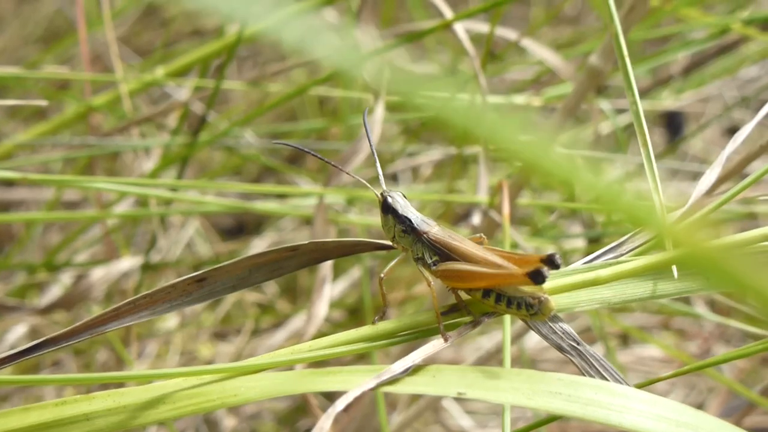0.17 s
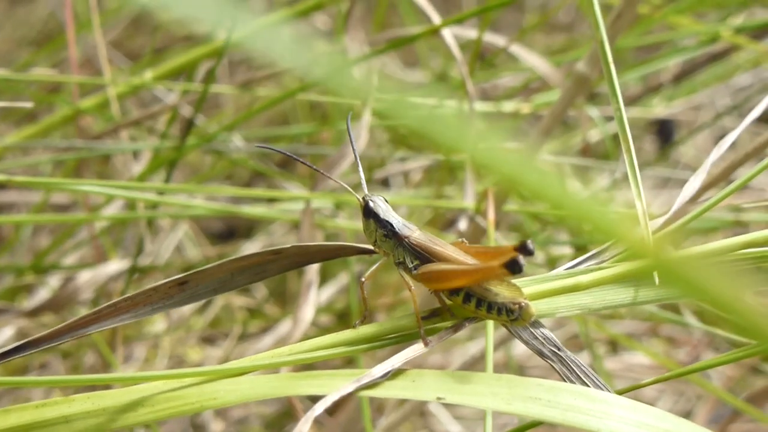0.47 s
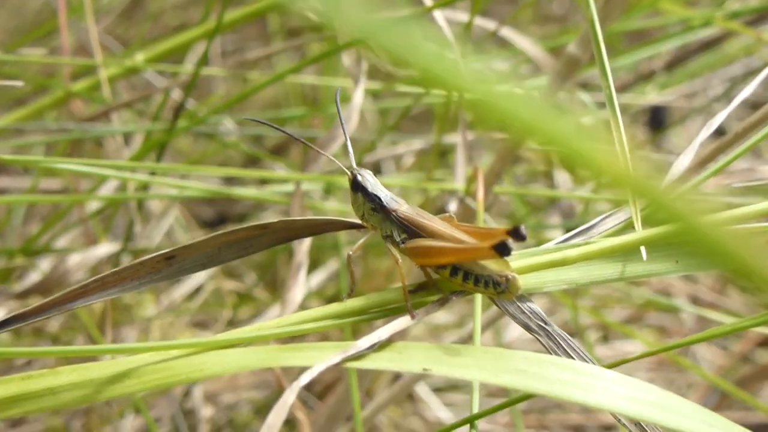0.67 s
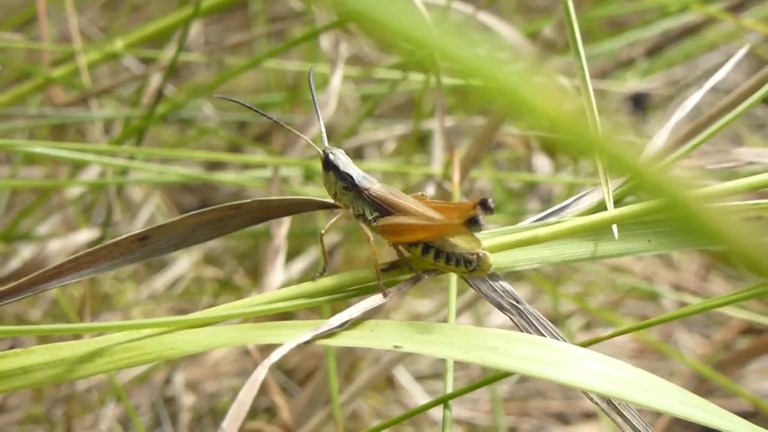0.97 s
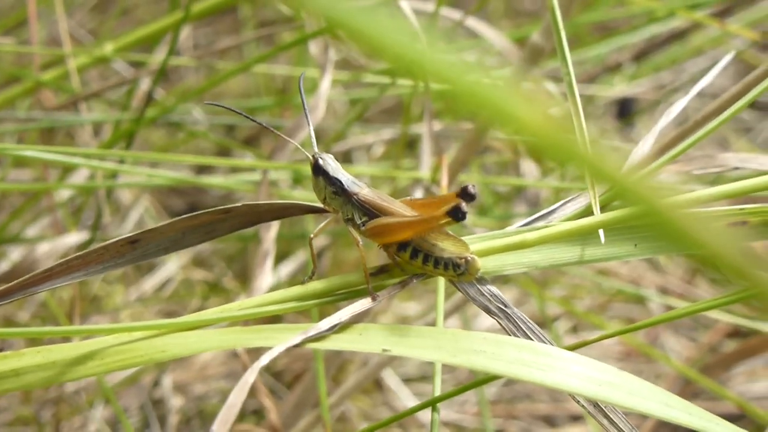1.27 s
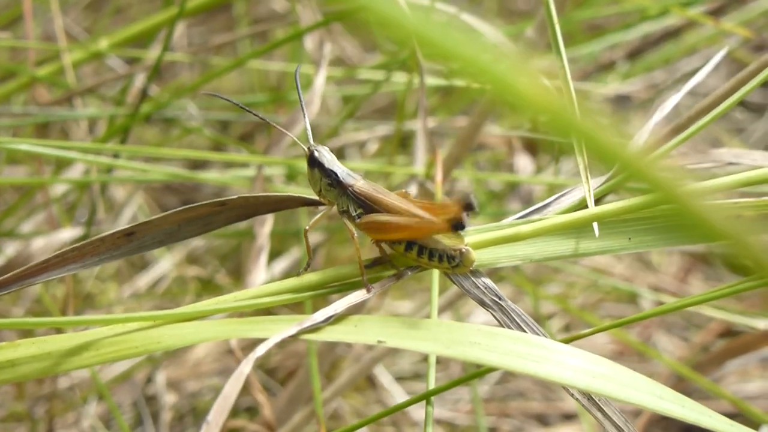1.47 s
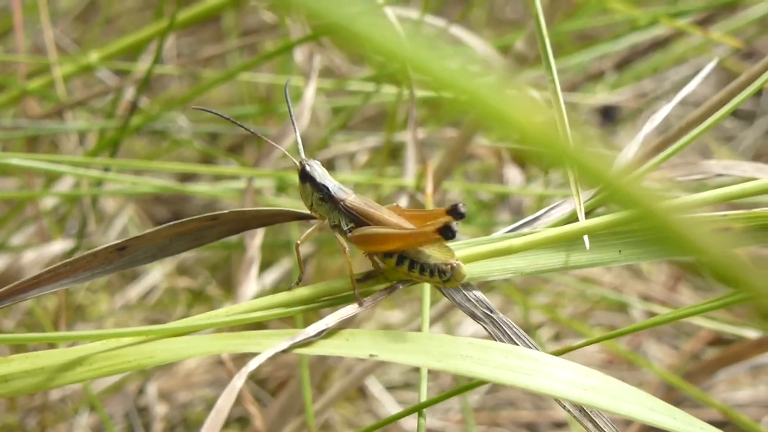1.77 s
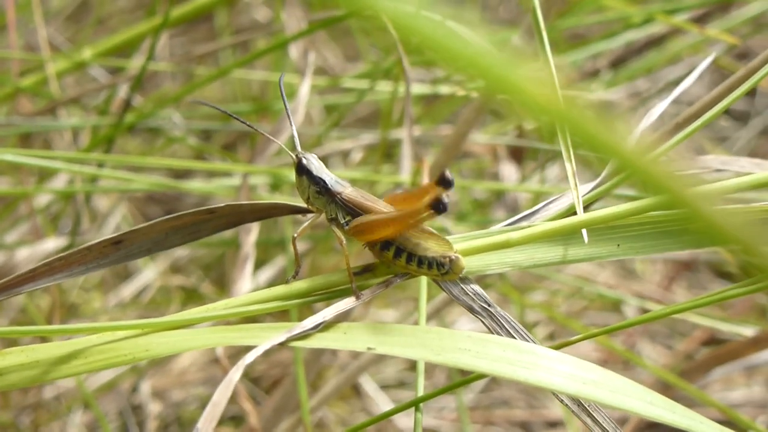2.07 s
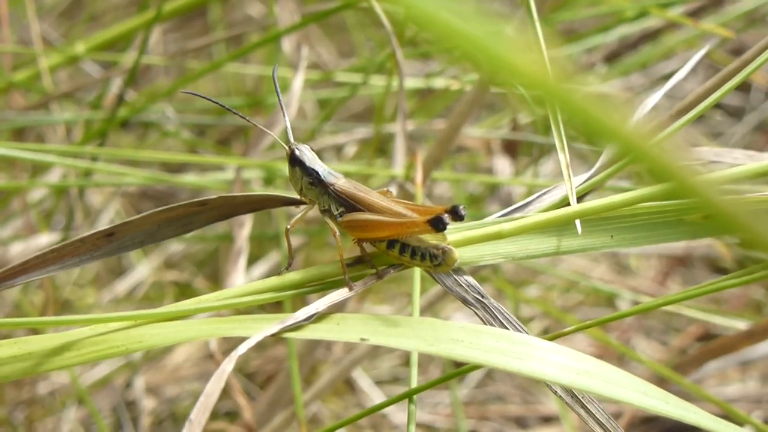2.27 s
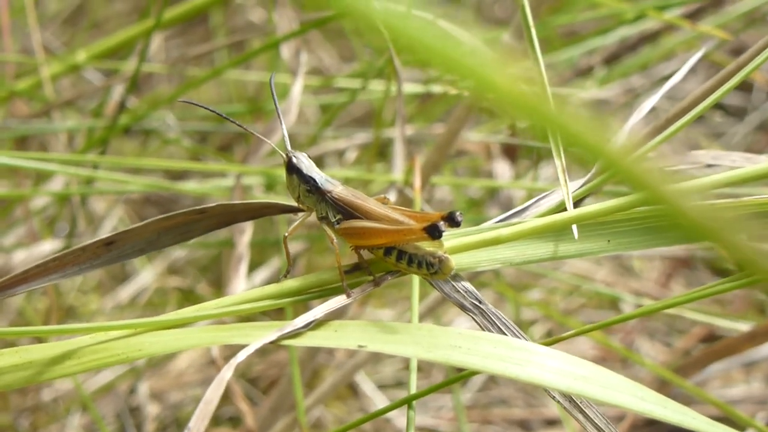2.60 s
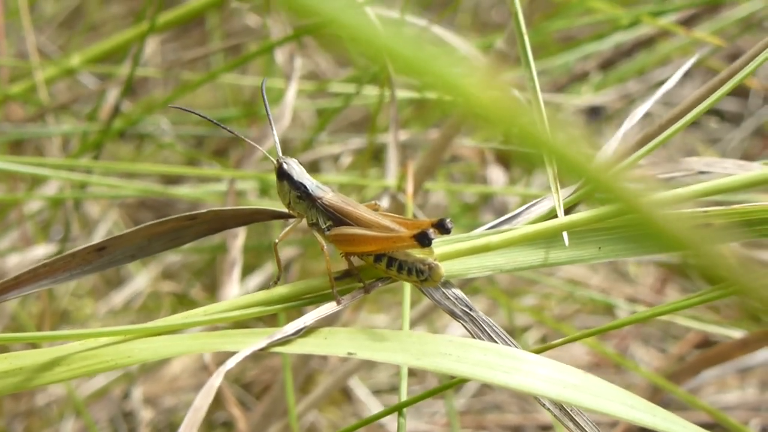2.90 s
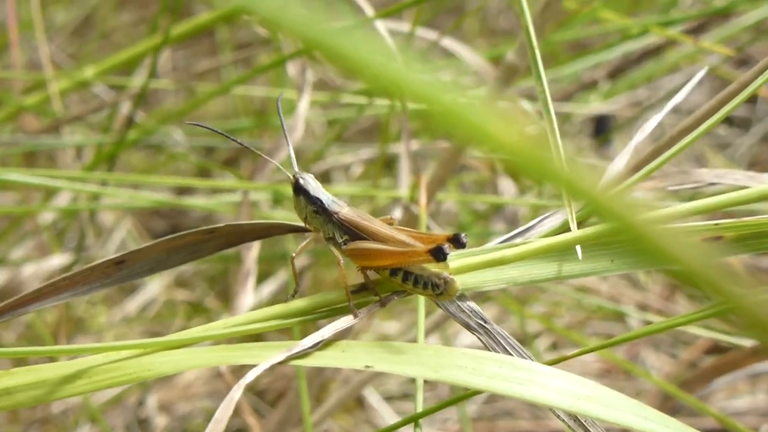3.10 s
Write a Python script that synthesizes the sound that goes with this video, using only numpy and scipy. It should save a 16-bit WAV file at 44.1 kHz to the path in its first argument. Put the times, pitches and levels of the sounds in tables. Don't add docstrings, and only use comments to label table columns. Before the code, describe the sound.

A grasshopper sings close to a small camera's stereo microphone, in a dry outdoor meadow without echo. After a tiny silence, from 0.05 to 2.17 seconds come thirteen raspy syllables, roughly six per second: a soft fizzing swell, then three to five louder, crisp jerks of fast treble clicks, slightly stronger later. Then only soft traffic rumble, hiss, faint high whine and a slight grass rustle near 2.9.

```python
import sys
import numpy as np
from scipy import signal
from scipy.fft import rfft, irfft
from scipy.io import wavfile
from scipy.ndimage import uniform_filter1d

SR = 44100
rng = np.random.default_rng(int(sys.argv[2]) if len(sys.argv) > 2 else 0)


def dump_mix(stems):
    frames = np.atleast_2d(stems).T
    limited = np.clip(frames, -1, 1)
    pcm = np.round(limited * 32767).astype(np.int16)
    wavfile.write(sys.argv[1], SR, pcm)


def attenuation_scalar(level_db):
    decades = np.asarray(level_db, float) / 20
    return 10 ** decades


N = 143325


def evened(x):
    return x / np.sqrt(np.mean(x ** 2) + 1e-20)


def read(points, hz):
    f, value = np.transpose(points)
    return np.interp(np.log(hz + 1), np.log(f + 1), value)


def drift(seconds):
    size = max(round(seconds * SR), 1)
    return evened(uniform_filter1d(uniform_filter1d(rng.standard_normal(N), size), size))


# [f/Hz, density/dB per Hz]
CENTRE_SPECTRUM = [(25, -17.5), (183, -1), (480, -7), (720, -10.5), (950, -13), (2000, -17), (4700, -19),
                   (10500, -24.5), (15500, -23.5)]
# [f/Hz, density/dB per Hz]
WIDTH_SPECTRUM = [(15, -52), (25, -38), (126, -9.5), (164, -8.5), (246, -7.5), (482, -5.5), (1530, -10.5),
                  (10600, -26), (15500, -26)]
# [f/Hz, width/Hz, level/dB]
TRAFFIC_HUMS = [(88, 10, 6), (630, 110, 4.5)]
# [centre t/s, half length t/s, f/Hz, width/Hz, level/dB]
RUSTLES = [
    (2.9, .17, 2900, 550, 3.0),
    (.06, .03, 100, 60, 4),
    (.58, .05, 80, 60, 6),
    (1.25, .03, 60, 40, 6),
    (1.97, .04, 100, 50, 6),
    (2.03, .04, 300, 100, 4),
    (.02, .05, 600, 150, -4),
    (3.13, .04, 120, 50, -6),
]


def meadow():
    centre_db, width_db = -50, -48.5
    patchy_db, swell_db, flicker_db = 0.27, -1.05, 1.0
    frames, hz = N // 256 + 5, np.fft.rfftfreq(1024, 1 / SR)
    a, b, c, d, patches = rng.standard_normal((frames, 513, 5)).T
    patches = evened(uniform_filter1d(uniform_filter1d(patches, 8, 0), 10, 1))
    at = np.minimum(np.arange(frames) * 256, N - 1)
    moving = patchy_db * patches + swell_db * drift(0.07)[at] + flicker_db * drift(0.023)[at]
    moving = moving / (1 + (hz[:, None] / 3500) ** 2)
    for s, half, rustle_hz, width_hz, rustle_db in RUSTLES:
        in_time = ((at / SR - s) / half) ** 2
        in_pitch = ((hz[:, None] - rustle_hz) / width_hz) ** 2
        moving += rustle_db * np.exp(-in_time - in_pitch)
    hum = sum(db / (1 + ((hz - f) / width) ** 2) for f, width, db in TRAFFIC_HUMS)
    shapes = np.array([read(CENTRE_SPECTRUM, hz) + hum, read(WIDTH_SPECTRUM, hz)])[:, :, None]
    z = np.array([a + 1j * b, c + 1j * d]) * attenuation_scalar(shapes + moving)
    mid, side = signal.istft(z, nperseg=1024, noverlap=768)[1][:, :N]
    mid, side = attenuation_scalar(centre_db) * evened(mid), attenuation_scalar(width_db) * evened(side)
    return np.array([mid + side, mid - side])


# [f/Hz, level/dB rms]
WHINE_TONES = [(6540, -81), (7820, -77), (8500, -73.5), (9625, -78.5), (10450, -77.5), (11450, -81)]


def whine():
    bursts_per_s, burst_at, burst_share = 30.0, .8, .2
    waver_db, waver_rad = 2.0, 1.0
    t = np.arange(N) / SR
    phase = (t * bursts_per_s - burst_at + .5) % 1 - .5
    burst = np.exp(-phase ** 2 / burst_share ** 2)
    tones = np.zeros(N)
    for hz, db in WHINE_TONES:
        level = attenuation_scalar(db + waver_db * drift(.04))
        tones += level * np.sin(2 * np.pi * hz * t + waver_rad * drift(0.052))
    return np.sqrt(2) * evened(burst) * tones


# [start t/s, end t/s, first level/dB, last level/dB]
UPSTROKES = [(0.074, 0.163, -64, -43), (0.24, 0.322, -61.5, -40), (0.396, 0.493, -60, -42.5),
             (0.562, 0.654, -60, -40), (0.728, 0.821, -58.5, -40), (0.886, 0.986, -59, -38.5),
             (1.065, 1.148, -55, -38.5), (1.205, 1.288, -59, -39), (1.37, 1.463, -56, -37.5),
             (1.543, 1.623, -52.5, -38.5), (1.714, 1.789, -50.5, -38), (1.871, 1.945, -55.5, -36.5),
             (2.055, 2.108, -49.5, -38)]


def upstrokes():
    bend, stutter_from = 0.86, 0.74
    lift_db_per_s, stutter_db, uneven_db = 450, 2.5, 2
    t, slow, stutter = np.arange(N) / SR, np.zeros(N), drift(0.0041) - 1
    for start, end, first_db, last_db in UPSTROKES:
        swell = np.clip((t - start) / (end - start), 0, 1) ** bend
        lift_db = lift_db_per_s * (np.maximum(t - end, 0) + 2 * np.maximum(start - t, 0))
        shaky = np.clip((swell - stutter_from) / (1 - stutter_from), 0, 1)
        slow += attenuation_scalar(first_db + (last_db - first_db) * swell - lift_db + stutter_db * stutter * shaky)
    return slow * attenuation_scalar(uneven_db * drift(0.006))


# [centre t/s, level/dB, length t/s]
JERKS = [(0.0578, -38, 0.0038), (0.1628, -38, 0.0026), (0.1739, -34.4, 0.005), (0.189, -32, 0.0069),
         (0.2086, -32.5, 0.0051), (0.32, -36.5, 0.0035), (0.3319, -34.5, 0.0044), (0.3468, -30.5, 0.0048),
         (0.3644, -30.5, 0.0044), (0.3851, -35, 0.0033), (0.482, -37, 0.0039), (0.5223, -30.5, 0.003),
         (0.5403, -30, 0.0037), (0.6464, -39, 0.0074), (0.6572, -35.5, 0.0063), (0.6732, -32.5, 0.0057),
         (0.69, -30.0, 0.0039), (0.7106, -35.0, 0.0032), (0.8178, -35.5, 0.0063), (0.8319, -30, 0.0042),
         (0.8493, -28.6, 0.0044), (0.8676, -43.4, 0.0031), (0.9828, -36.5, 0.0061), (0.999, -30.5, 0.0049),
         (1.0154, -28.5, 0.005), (1.0352, -32.6, 0.0021), (1.1462, -33.5, 0.005), (1.161, -30.5, 0.0076),
         (1.1769, -29, 0.0056), (1.1962, -27.5, 0.0047), (1.299, -35, 0.0072), (1.3104, -32, 0.0044),
         (1.3284, -30.5, 0.0056), (1.3482, -28, 0.0048), (1.3659, -43.9, 0.0049), (1.3783, -46, 0.0081),
         (1.4674, -35, 0.009), (1.4827, -31, 0.008), (1.4995, -27, 0.0049), (1.5193, -27.5, 0.005),
         (1.6316, -33.0, 0.0049), (1.6483, -30, 0.005), (1.666, -27, 0.0042), (1.6857, -29, 0.0057),
         (1.7929, -33, 0.0072), (1.8087, -29.5, 0.0076), (1.8262, -28, 0.0053), (1.8457, -30.5, 0.0042),
         (1.9363, -38, 0.0098), (1.9492, -36, 0.009), (1.9625, -33, 0.005), (1.9788, -29, 0.0058),
         (1.9981, -27.5, 0.0042), (2.0202, -41, 0.0046), (2.1095, -35.5, 0.0089), (2.1214, -31, 0.0038),
         (2.141, -29.5, 0.0069), (2.1613, -30.0, 0.0045)]


def jerks():
    rise, fall, edge = 2.5, 2.1, 4.0
    tail_db, tail_s, tail_lag_s = -19.5, .004, .0015
    t, fast = np.arange(N) / SR, np.zeros(N)
    for s, level_db, length in JERKS:
        span = slice(round(s * SR) - 800, round(s * SR) + 800)
        after = t[span] - s
        steep = np.where(after < 0, rise, fall)
        pulse_db = 6 * (steep * abs(after) / length) ** edge
        tail_fall_db = 6 * ((after - tail_lag_s) / tail_s) ** 2
        fast[span] += attenuation_scalar(level_db - np.minimum(pulse_db, 200))
        fast[span] += attenuation_scalar(level_db + tail_db - np.minimum(tail_fall_db, 200))
    return fast


def pegs(slow, fast):
    slow_per_s, fast_per_s = 750, 1500
    share = np.clip((20 * np.log10(fast + 1e-9) + 36) / 5, 0, 1)
    rate = slow_per_s + (fast_per_s - slow_per_s) * share
    turns = np.cumsum(rate * (1 + 0.18 * drift(.01))) / SR + .2 * np.tanh(drift(.001))
    hit = np.diff(np.floor(np.maximum.accumulate(turns)), prepend=0) > 0
    size = attenuation_scalar(0.5 * np.clip(rng.standard_normal(N), -3, 1.5))
    return hit * size * np.maximum(slow, fast) * np.sqrt(SR / rate / 0.99)


# [t/s, peak level/dB]
LONE_PEGS = [(0.1589, -24), (0.1663, -25.4), (0.3255, -25.8), (0.3382, -20), (0.3395, -20), (0.351, -23.0),
             (0.487, -27), (0.4902, -26.0), (0.492, -26), (0.495, -24.4), (0.4997, -25), (0.506, -27),
             (0.5101, -22.3), (0.5142, -23.9), (0.6778, -22), (0.812, -30), (0.9718, -25.5), (0.974, -25.5),
             (0.9758, -26.5), (0.978, -26.3), (0.988, -23), (1.132, -24.6), (1.134, -24.8), (1.1351, -26),
             (1.1365, -22.5), (1.1407, -26), (1.1416, -22.5), (1.1506, -23.6), (1.1994, -30), (1.4605, -22),
             (1.4631, -25), (1.4641, -24), (1.4655, -23.7), (1.4666, -24), (1.4684, -21.6), (1.4695, -22.1),
             (1.4705, -22), (1.4715, -23.5), (1.6074, -26.5), (1.6111, -25.1), (1.6183, -22.6),
             (1.6188, -23), (1.6229, -24), (1.6259, -23.7), (1.6276, -24.5), (1.6895, -23.9), (1.7693, -27),
             (1.7811, -25.5), (1.7817, -25), (1.7825, -25), (1.7846, -25), (1.7853, -24.5), (1.7972, -25),
             (1.9347, -27), (1.9393, -26.3), (1.966, -22.5), (2.1246, -22), (2.1254, -22), (2.1271, -19.5),
             (2.165, -23.1)]


def leg_clicks(slow, fast):
    lone_db, clear_s = 4.5, 0.00051
    rasp = pegs(slow, fast) + attenuation_scalar(-7) * pegs(slow * attenuation_scalar(4.5), fast)
    lone = np.zeros(N)
    for s, peak_db in LONE_PEGS:
        lone[round(s * SR)] = attenuation_scalar(peak_db + lone_db)
    clear = uniform_filter1d(lone, 2 * round(clear_s * SR) + 1) < 1e-9
    return lone + rasp * clear


def colour(points, hz):
    gain = attenuation_scalar(read(points, hz))
    return gain / np.sqrt(2 / SR * np.sum(gain[(hz > 5000) & (hz < 15000)] ** 2) * hz[1])


# [f/Hz, density/dB per Hz]
UPSTROKE_WING = [(2500, -20.5), (4100, -7), (4900, -6), (6500, -3.5), (9000, -3.5), (11000, -3),
                 (13100, -1), (15500, -5.5)]
# [f/Hz, density/dB per Hz]
JERK_WING = [(2500, -28.5), (4000, -19), (4900, -8.5), (6200, -4), (9000, -1.5), (11000, 0), (13600, 1),
             (15500, -6)]
# [delay t/ms, gain]
FAR_PATHS = [(-0.05, 0.2), (0.01, 0.42), (0.116, 0.13), (0.343, 0.079), (0.433, 0.039), (0.506, -0.13),
             (0.625, 0.13)]
# [f/Hz, level/dB]
FAR_SHADE = [(4800, -0.5), (7600, -2.5), (9000, 2.5), (10300, -2), (11700, -2), (13100, -14.5), (14500, 3),
             (15500, -5)]


def grasshopper(spots=18):
    ring_db, scatter_db = -4.5, -7.5
    t60_s = np.array([[.0035], [0.0037]])
    slow, fast = upstrokes(), jerks()
    clicks = leg_clicks(slow, fast)
    spot, t, out = rng.integers(0, spots, N), np.arange(320) / SR, np.zeros((2, N))
    for k in range(spots):
        ring, scatter = rng.standard_normal((2, 320)) * attenuation_scalar(-60 * t / t60_s)
        ring = attenuation_scalar(ring_db) * ring / np.linalg.norm(ring) + (t == 0)
        taps = [ring / np.linalg.norm(ring), attenuation_scalar(scatter_db) * scatter / np.linalg.norm(scatter)]
        out += signal.oaconvolve((clicks * (spot == k))[None], taps, axes=1)[:, :N]
    hz = np.fft.rfftfreq(N, 1 / SR)
    jerk_share = fast / (fast + slow + 1e-9)
    rising = rfft(out * (1 - jerk_share)) * colour(UPSTROKE_WING, hz)
    falling = rfft(out * jerk_share) * colour(JERK_WING, hz)
    near, scattered = rising + falling
    paths = sum(gain * np.exp(-2j * np.pi * hz * ms / 1000) for ms, gain in FAR_PATHS)
    far = (near * paths + scattered) * attenuation_scalar(read(FAR_SHADE, hz))
    return irfft(np.array([near, far]), N)


def scene():
    return meadow() + whine() + grasshopper()


# [f/Hz for centre, f/Hz for width]
THIN_FROM = [1700, 2400]
# [f/Hz for centre, f/Hz for width]
THIN_TO = [3500, 4800]


def thinned(x, size=6):
    busy_db, lost_share = -47, .16
    mid_side = np.array([x[0] + x[1], x[0] - x[1]]) / 2
    f, _, z = signal.stft(mid_side, SR, nperseg=1024, noverlap=768)
    busy = 10 * np.log10(2 * np.sum(abs(z[0, f > 5000]) ** 2, 0) + 1e-12) > busy_db
    luck = rng.random((2, len(f) // size + 1, z.shape[2] // size + 1))
    luck = luck.repeat(size, 1).repeat(size, 2)[:, :len(f), :z.shape[2]]
    band = (f > np.c_[THIN_FROM]) & (f < np.c_[THIN_TO])
    drop = (luck < lost_share) & busy & band[:, :, None]
    mid, side = signal.istft(z * ~drop, SR, nperseg=1024, noverlap=768)[1][:, :N]
    return np.array([mid + side, mid - side])


# [centre t/s, length t/s, from f/Hz, share of bands lost]
DROPOUTS = [
    (.3755, .010, 3200, .6),
    (.531, .010, 3800, .6),
    (.701, .010, 3500, .6),
    (1.187, .009, 5000, .55),
    (1.508, .007, 3300, .9),
    (1.676, .007, 5500, 1),
    (1.818, .004, 4000, .6),
    (2.005, .005, 3800, .6),
]


def hiss_gaps(x):
    f, at, z = signal.stft(x, SR, nperseg=128, noverlap=96)
    keep, luck = np.ones(z.shape[1:]), rng.random((len(DROPOUTS), 17)).repeat(4, 1)
    for (s, length, from_hz, share), row in zip(DROPOUTS, luck):
        lost = (f > from_hz) & (row[:len(f)] * np.clip(f / 9000, .3, 1) < share)
        keep *= 1 - np.outer(lost, abs(at - s) < length / 2)
    return signal.istft(z * keep, SR, nperseg=128, noverlap=96)[1][:, :N]


def top_cut(x):
    return signal.sosfilt(signal.butter(12, 16960, fs=SR, output="sos"), x)


def record(dry):
    ceiling, low_cut_hz, edge_hz = .19, 42, 15800
    top_db, top_fall_db_per_khz, top_opens_db = 3, 32, -32
    preroll_s, open_s, preroll_db = 0.039, .0415, -18
    t, hz = np.arange(N) / SR, np.fft.rfftfreq(N, 1 / SR)
    dry = ceiling * np.tanh(dry / ceiling)
    spectrum = rfft(dry)
    low = irfft(spectrum * (hz < edge_hz) / np.sqrt(1 + (low_cut_hz / (hz + 1)) ** 4), N)
    top = irfft(spectrum * (hz >= edge_hz) * attenuation_scalar(-top_fall_db_per_khz * abs(hz - edge_hz) / 1000), N)
    power_db = 10 * np.log10(abs(uniform_filter1d((dry ** 2).mean(0), size=200)) + 1e-12)
    loud = uniform_filter1d(np.clip((power_db - top_opens_db) / 4, 0, 1), size=100)
    kept = hiss_gaps(thinned(low) + attenuation_scalar(top_db) * loud * top)
    opening = np.where(t > open_s, 1, attenuation_scalar(preroll_db) * (t > preroll_s))
    return top_cut(kept * opening)


dry = scene()
out = record(dry)
dump_mix(out)
```